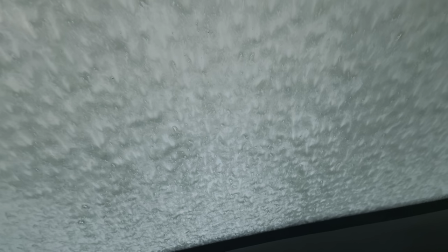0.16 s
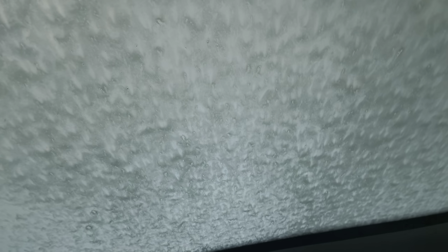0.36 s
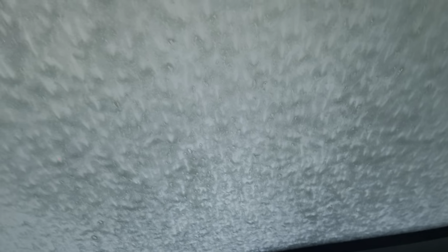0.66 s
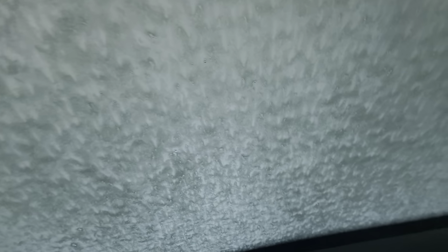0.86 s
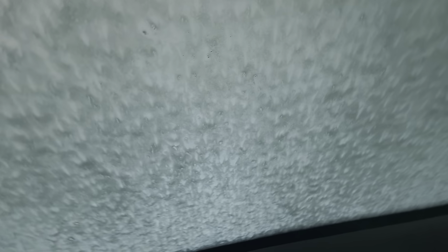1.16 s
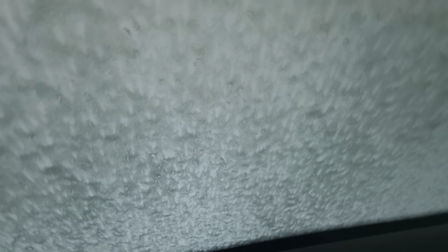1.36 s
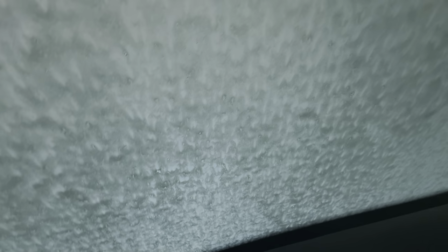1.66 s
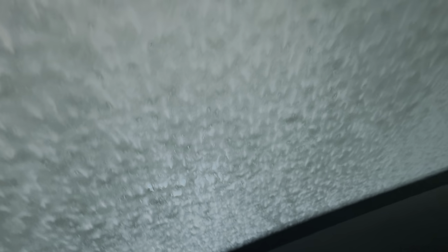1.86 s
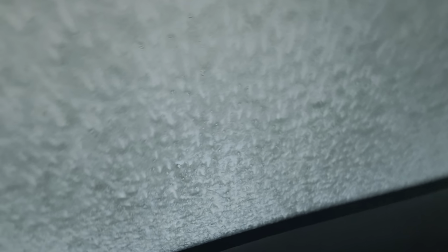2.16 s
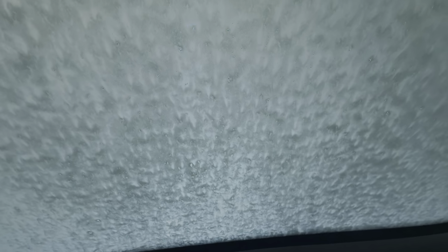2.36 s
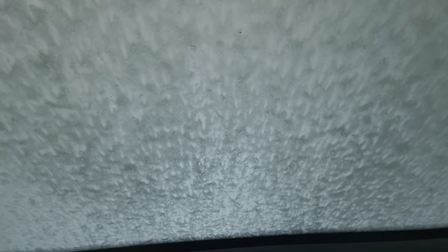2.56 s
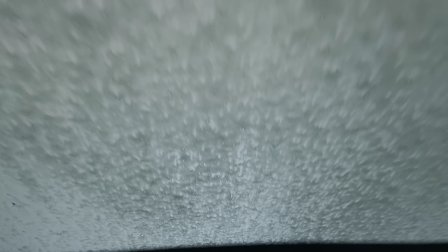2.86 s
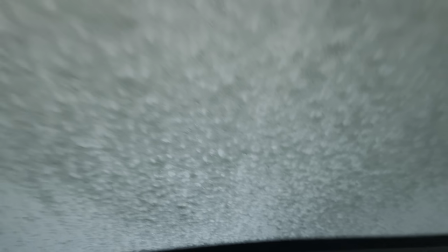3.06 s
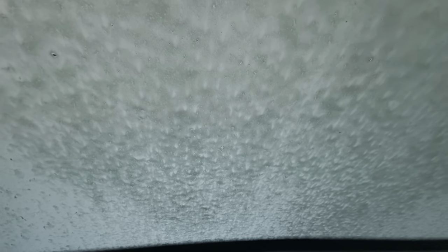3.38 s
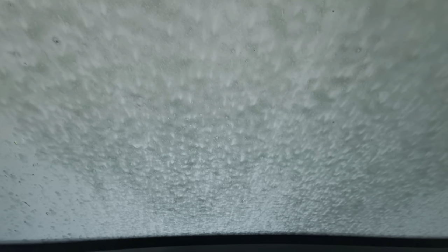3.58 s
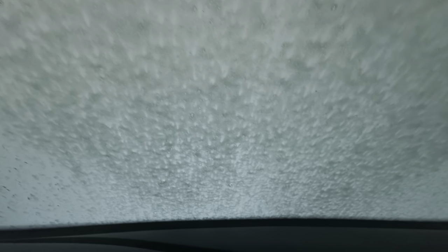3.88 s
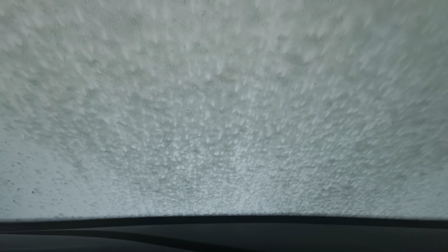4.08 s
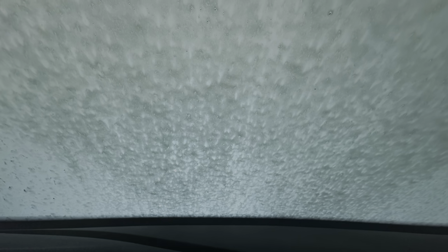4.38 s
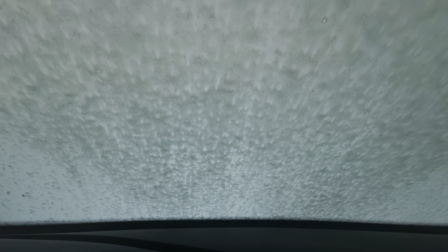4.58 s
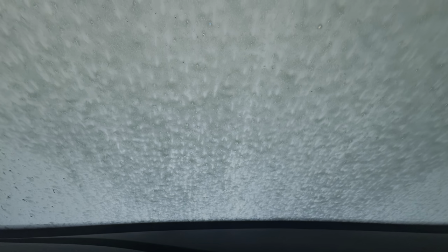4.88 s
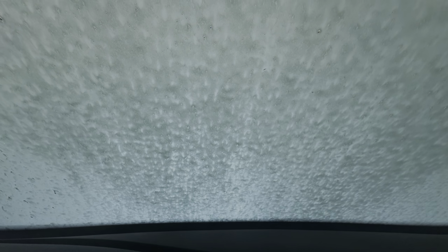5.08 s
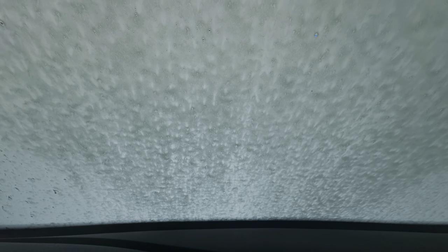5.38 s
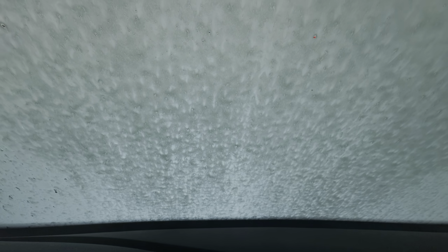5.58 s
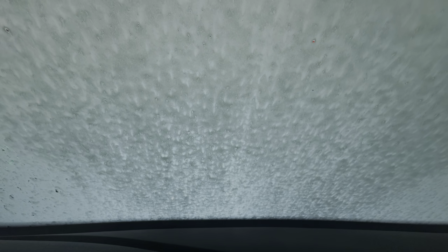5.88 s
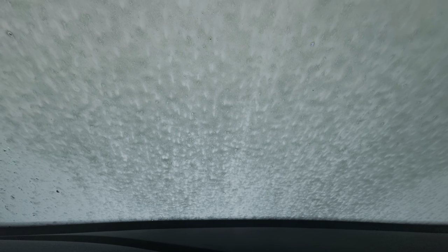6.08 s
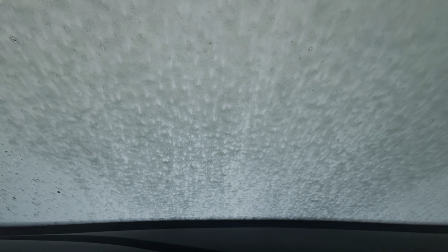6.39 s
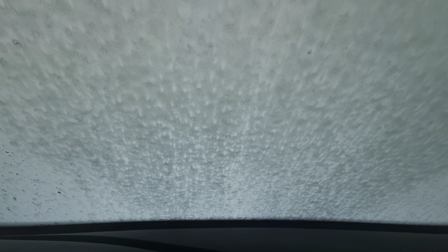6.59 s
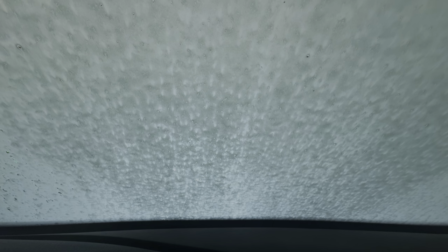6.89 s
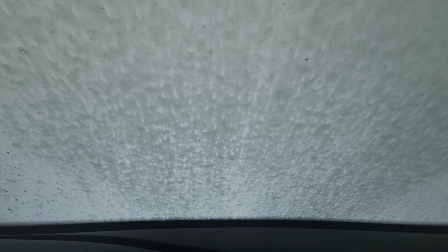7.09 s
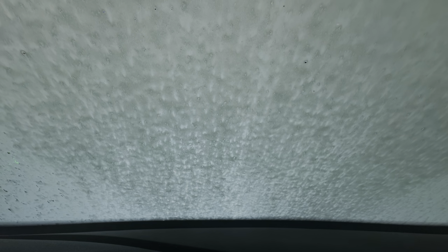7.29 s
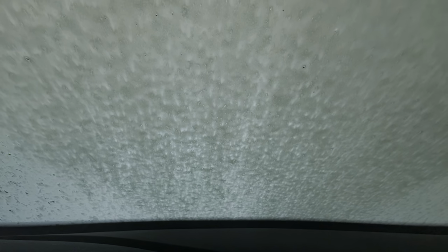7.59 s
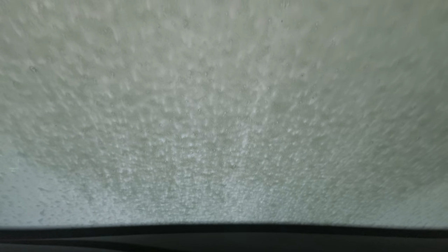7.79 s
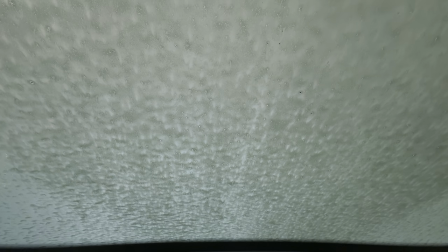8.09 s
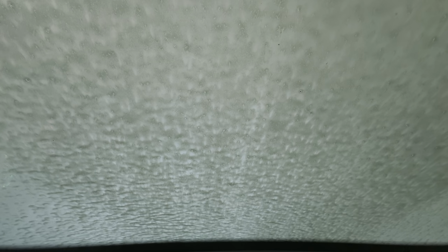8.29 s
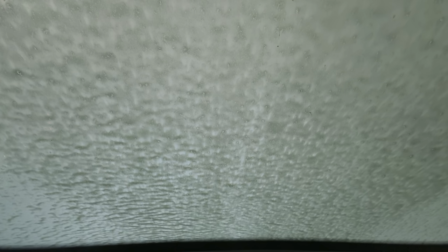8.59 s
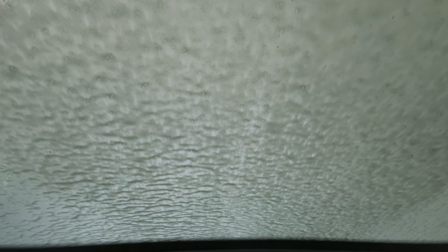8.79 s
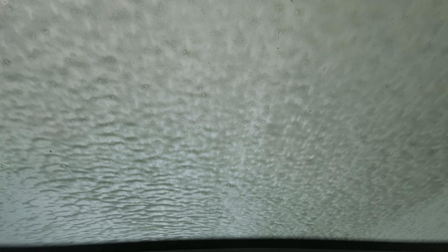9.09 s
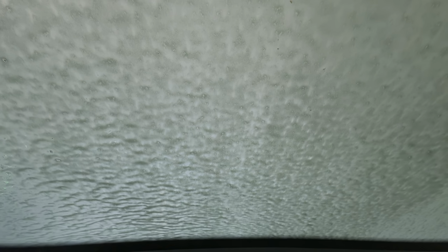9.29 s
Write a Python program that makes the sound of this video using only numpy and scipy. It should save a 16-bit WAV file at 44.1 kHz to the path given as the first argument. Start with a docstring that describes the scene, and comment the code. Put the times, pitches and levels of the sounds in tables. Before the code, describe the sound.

Inside a closed car at an automatic wash, a low, muffled machinery drone runs throughout. Close to the microphone, cloth rustles, scuffs, snaps and ticks, with a few dull knocks, then settles to near stillness. At about five and a half seconds a motor runs up with a swelling hum, a valve opens with a brief high whistle, and fine mist thickens into dense hissing jets on glass and roof.

```python
"""A low machinery drone comes first, dulled by the shell of a closed car in a wash tunnel, with cloth
rustling and ticking close to the microphone: shaped noise, wavering sines, short bursts and decaying modes.
Then a motor runs up, as noise with a climbing top, pump overtones and a hum that swells in the cabin.
A valve opens with a short whistle of two sines, and water beats on glass and roof as hiss that
thickens from mist to jets."""
import sys
import numpy as np
from scipy import signal
from scipy.fft import rfft, irfft
from scipy.io import wavfile
from scipy.ndimage import uniform_filter1d

SR = 44100
rng = np.random.default_rng(int(sys.argv[2]) if len(sys.argv) > 2 else 0)


def dump_mix(stems):
    """Bounce the given channels to the path in sys.argv[1] as a 16-bit WAV at rate SR."""
    frames = np.atleast_2d(stems).T  # one column per channel
    limited = np.clip(frames, -1, 1)  # hard clip at full scale
    pcm = np.round(limited * 32767).astype(np.int16)
    wavfile.write(sys.argv[1], SR, pcm)


def gain_from_decibels(decibels):
    """Convert decibel values to linear amplitude factors."""
    exponent = np.asarray(decibels, float) / 20
    return 10 ** exponent


N = 416744  # samples
QUIET_S, START_S, VALVE_S = 3.6, 5.5, 5.78  # the hand rests, the motor starts, the valve cracks open


def read(points, hz):
    """A spectrum joined by straight lines on a log-frequency axis, -120 dB outside its points."""
    f, value = np.transpose(points)
    return np.interp(np.log(hz + 1), np.log(f + 1), value, left=-120, right=-120)


def follow(rows, t):
    """Columns of a curve at the times t."""
    s, *columns = np.transpose(rows)
    return [np.interp(t, s, c) for c in columns]


def evened(x):
    """Scaled to rms 1."""
    return x / np.sqrt(np.mean(abs(x) ** 2) + 1e-20)


def wander(smooth_s):
    """Slow random movement of rms 1: white noise averaged twice over smooth_s."""
    size = max(int(smooth_s * SR), 2)
    return evened(uniform_filter1d(uniform_filter1d(rng.standard_normal(N), size), size))


def octaves(hz):
    """Distance from 4 kHz in octaves, held below 400 Hz."""
    return np.log2(np.maximum(hz, 400) / 4000)


def peaks(modes, hz):
    """Summed power of resonances, each a quarter of its peak at the edges of its width."""
    power = 0
    for centre_hz, width_hz, db in modes:
        offset = (hz - centre_hz) / (.5 * width_hz)
        power = power + gain_from_decibels(db) ** 2 / (1 + offset ** 2) ** 2
    return power


def tones(t, lines, waver_db, drift_rad, smooth_s):
    """Sines whose level and phase waver slowly."""
    out = np.zeros(len(t))
    for hz, db in lines:
        level = gain_from_decibels(db + waver_db * wander(smooth_s))
        out += level * np.sin(2 * np.pi * hz * t + drift_rad * wander(smooth_s))
    return out


def noise(colour_db, patchy_db, flicker_db, size=1024):
    """Random short-time spectra of rms 1; colour_db(Hz, s) shapes them, patches drift and frames flicker."""
    hop = size // 4
    frames, hz = N // hop + 5, np.fft.rfftfreq(size, 1 / SR)[:, None]
    real, imaginary, patches = rng.standard_normal((frames, len(hz), 3)).T
    patches = evened(uniform_filter1d(uniform_filter1d(patches, 10, axis=0), 10, axis=1))
    frame_s = np.arange(frames)[None] * hop / SR
    shape = gain_from_decibels(colour_db(hz, frame_s) + np.zeros((1, frames)))
    shape = shape / np.sqrt((shape ** 2).mean(0))  # colour alone does not change a frame's level
    gain = gain_from_decibels(patchy_db * patches + flicker_db * rng.standard_normal(frames))
    spectra = (real + 1j * imaginary) * shape * gain
    return evened(signal.istft(spectra, nperseg=size, noverlap=size - hop)[1][:N])


def burst(gain, uneven_db=3.5):
    """Noise of rms 1 with the given spectrum, made uneven as each contact rings a different spot."""
    spots = uniform_filter1d(uniform_filter1d(rng.standard_normal(len(gain)), 60), 60)
    white = rfft(rng.standard_normal(2 * len(gain) - 2))
    return evened(irfft(white * gain * gain_from_decibels(uneven_db * evened(spots))))


# Faint tunnel background: (frequency [Hz], relative density [dB per Hz])
MURMUR_COLOUR = [(900, -10), (1400, 1.5), (1700, -8), (2600, -13), (3600, -9.5), (4100, -23), (6000, -40.5)]


def murmur():
    """Far water and machines flutter faintly in the middle tones."""
    return gain_from_decibels(-82.5) * noise(lambda hz, s: read(MURMUR_COLOUR, hz), 3.5, 1.1, size=512)


# Distant machinery through the closed shell: (frequency [Hz], relative density [dB per Hz])
DRONE_COLOUR = [(12, -30.5), (22, -25.5), (30, -23), (38, -7), (60, -13.5), (100, -7), (170, -15),
                (200, -20.5), (460, -24.5), (545, -32), (830, -38), (1400, -45.5), (1650, -54), (3500, -60),
                (9000, -84.5)]
# Its level at the microphone: (time [s], level [dB])
DRONE_CURVE = [(0, -41), (1.4, -40), (2.4, -42.5), (5.5, -43.5), (5.8, -41.5), (6.5, -39.5), (7.5, -33),
               (8, -39.5), (9.45, -29.5)]
# Cabin modes and far tones that stand out: (frequency [Hz], width [Hz], lift relative to the drone [dB])
CABIN_MODES = [(48.8, 13, 11), (69.4, 14, 11.5), (90.85, 3.4, 2.5), (122.5, 2.4, 3), (161.2, 2.7, 6),
               (265.4, 11.6, 4.5), (382.5, 9.8, 1.5), (461, 30, 2)]
# Distant motors: (frequency [Hz], level [dB])
FAR_MOTORS = [(46, -47), (92, -51), (120, -53.5), (158, -58.5), (268, -62.5)]


def drone(t):
    """Far pumps and fans, dull through the shell and lifted at the cabin modes."""
    def colour_db(hz, s):
        return read(DRONE_COLOUR, hz) + 10 * np.log10(1 + peaks(CABIN_MODES, hz))
    rumble = gain_from_decibels(follow(DRONE_CURVE, t)[0]) * noise(colour_db, 0.57, 0.26, size=8192)
    return rumble + tones(t, FAR_MOTORS, waver_db=2.43, drift_rad=1.04, smooth_s=0.25)


# Cloth close to the microphone, also in scuffs and ticks: (frequency [Hz], relative density [dB per Hz])
CLOTH_COLOUR = [(400, -10.5), (800, -3), (2000, -3.5), (4500, -7.5), (7500, -4), (12000, -1.5),
                (17000, -15.5)]
# Its rustle: (time [s], level [dB])
RUSTLE_CURVE = [(0, -53.5), (.06, -56.5), (.36, -59.5), (.78, -60), (1.08, -64), (1.25, -58.5), (1.4, -58),
                (1.6, -62.5), (1.8, -63.5), (2.05, -72), (2.5, -79), (2.86, -79), (3.02, -70), (3.2, -75),
                (3.4, -73.5), (3.7, -85), (5.6, -86)]


def cloth(t):
    """Fibres sliding: a soft hiss that follows the hand."""
    def colour_db(hz, s):
        tilt_db = np.where(s < QUIET_S, 0.3, -1.5)  # brightening per octave, moving and then resting
        return read(CLOTH_COLOUR, hz) + tilt_db * octaves(hz)
    hiss = noise(colour_db, 1.5, .8, size=256)
    return gain_from_decibels(follow(RUSTLE_CURVE, t)[0]) * hiss * (t < VALVE_S)


# Short sliding strokes of cloth near the microphone:
# (time [s], length [s], hiss level [dB], brightening [dB per octave], dull body level [dB])
STROKES_OF_CLOTH = [(0.151, 0.087, -59.5, -1, -61), (0.43, 0.072, -70, 8, -81),
                    (1.299, 0.008, -47.5, 0, -55), (1.33, 0.0082, -39, 2, -64), (1.43, 0.02, -66, -4, -52),
                    (1.452, 0.025, -53.5, 1, -51.5), (1.495, 0.022, -46, 1.5, -40),
                    (1.546, 0.016, -48, 5, -56), (1.596, .008, -52, -5, -42), (2.021, .008, -50, 0, -58),
                    (2.123, .008, -40, 7, -48), (1.89, 0.031, -68, 3, -79), (2.306, 0.061, -71, 0, -69),
                    (2.515, 0.06, -67.5, 6, -60.5), (2.581, 0.06, -70.5, 1, -64),
                    (2.894, 0.05, -46, 3, -56.5), (2.945, 0.069, -64, 4, -72),
                    (3.039, 0.027, -55.5, 5, -51), (3.098, 0.049, -56.5, 1.5, -62),
                    (3.15, 0.02, -59, 6, -65), (3.286, 0.027, -55.5, 0.5, -56),
                    (3.322, 0.039, -59.5, 3, -56.5), (3.406, 0.02, -66.5, -2.5, -72),
                    (4.4, 0.067, -74.5, -5.5, -84)]
# Dull ring of the plastic trim, also in ticks: (frequency [Hz], width [Hz], level [dB])
TRIM_MODES = [(395, 570, 10.5), (904, 1200, 4.5), (1520, 900, -3), (2040, 670, -11), (2900, 540, -7.5)]


def scuffs():
    """Each stroke holds a hiss over the dull body of the trim, then dies away."""
    out, t = np.zeros(N), np.arange(8192) / SR
    hz = np.fft.rfftfreq(len(t), 1 / SR)
    for s, length_s, level_db, tilt_db, body_db in STROKES_OF_CLOTH:
        hiss = gain_from_decibels(level_db) * burst(gain_from_decibels(read(CLOTH_COLOUR, hz) + tilt_db * octaves(hz)))
        body = gain_from_decibels(body_db) * burst(np.sqrt(peaks(TRIM_MODES, hz)))
        hold = (1 - np.exp(-t / 0.0037)) * gain_from_decibels(-60 * np.maximum(t - length_s, 0) / 0.056)
        out[round(s * SR):][:len(t)] += hold * (hiss + body)
    return out


def settling():
    """Rows of faint snaps at random times while the cloth rests."""
    per_s, level_db, spread_db = 4, -73, 3.5
    rest_s = START_S - QUIET_S
    rows = []
    for when, loud, bright, ring in rng.random((round(per_s * rest_s), 4)):
        crack_db = level_db + spread_db * (2 * loud - 1)
        rows.append((QUIET_S + when * rest_s, crack_db, level_db, 10 * bright - 3, 2000 + 10000 * ring))
    return rows


# Snaps of cloth and trim, levels before the envelopes:
# (time [s], bright crack [dB], dull body [dB], brightening [dB per octave], ringing spot [Hz])
SNAPS = [(0.2713, -45, -51, 0, 2180), (0.3105, -35.5, -45, -3, 11800), (0.383, -42.5, -68, 4, 7000),
         (0.555, -32.5, -41.5, 1, 3720), (0.79, -35, -47.5, 0.5, 8550), (0.9393, -33.5, -43, -1, 3750),
         (0.9505, -42, -44, -1.5, 3770), (0.962, -47, -51, -2, 3700), (0.992, -37, -56, 2.5, 6650),
         (1.0882, -50, -55.5, 0, 2010), (1.1497, -20, -44, 3, 6000), (1.1709, -42, -37, 4, 2930),
         (1.211, -33, -48, 2, 8500), (1.4923, -36, -30, 0.5, 2040), (1.53, -50, -34.5, 3, 2310),
         (1.5504, -40, -50, 5, 8700), (1.5952, -38, -36, -5, 2040), (1.8233, -37, -55, 2, 7660),
         (2.0208, -36, -46, -1.5, 2460), (2.1203, -22.5, -42.5, 6, 7500), (2.7121, -30.5, -46, 2.5, 3700),
         (3.049, -56, -46, 0, 2100), (3.2246, -50.5, -70, 5, 2000), (3.2886, -50, -50, 0, 2100),
         (3.5843, -55.5, -68, -1, 12700), (4.268, -67, -72.5, 7, 12500), (4.3187, -56, -77, 1.5, 8000),
         (4.4189, -66, -75, 7, 11800), (4.5555, -68, -75, 7, 12500), (5.1068, -58, -75, -5, 7210)]


def ticks():
    """Each snap is a bright crack with a short tail and one ringing spot, over a dull ring of the trim."""
    ring_width, ring_db, uneven_db = .09, 9, 3  # width as a share of the ringing frequency
    out, t = np.zeros(N), np.arange(8192) / SR
    hz = np.fft.rfftfreq(len(t), 1 / SR)
    for s, crack_db, body_db, tilt_db, ring_hz in SNAPS + settling():
        t60_s = max(.038 + 0.0025 * max(tilt_db, -2), .015)  # brighter snaps ring longer
        tail = gain_from_decibels(-60 * t / t60_s)
        spot = np.sqrt(1.5 + peaks([(ring_hz, ring_width * ring_hz, ring_db)], hz))
        colour = gain_from_decibels(read(CLOTH_COLOUR, hz) + tilt_db * octaves(hz)) * (hz > 2000)
        crack = gain_from_decibels(crack_db) * burst(colour * spot, uneven_db)
        crack *= (1 - np.exp(-t / .0006)) * (.42 * gain_from_decibels(-60 * t / 0.0088) + 0.38 * tail)
        ring = gain_from_decibels(body_db) * burst(np.sqrt(peaks(TRIM_MODES[1:], hz)), uneven_db)
        ring *= (1 - np.exp(-t / 0.0016)) * tail
        out[round(s * SR):][:len(t)] += crack + ring
    return out


# Knocks against the case: (time [s], level before the envelope [dB], frequency [Hz], 60 dB decay [s])
KNOCKS = [(1.4816, -14, 112, 0.043), (1.49, -28, 60.5, 0.62), (1.532, -11, 120.6, 0.085),
          (3.052, -32, 159, 0.13), (3.3, -40.5, 380, 0.14), (5.721, -24.5, 50.5, 0.57)]


def thumps(t):
    """A low mode of the case or the cabin, pushed once."""
    out = np.zeros(N)
    for s, level_db, hz, t60_s in KNOCKS:
        since = np.maximum(t - s, 0)
        envelope = (1 - np.exp(-since / 0.0054)) * gain_from_decibels(level_db - 60 * since / t60_s)
        out += envelope * np.sin(2 * np.pi * hz * since)
    return out


# Water on glass and roof, at the microphone inside: (time [s], level [dB])
SPRAY_CURVE = [(5.53, -92), (5.55, -74.5), (5.68, -70.5), (5.77, -77), (5.79, -65), (5.95, -59),
               (5.98, -54), (6.88, -52), (6.98, -42.5), (7.3, -43), (8.0, -44), (8.72, -44), (9.1, -41.5),
               (9.27, -40.5), (9.35, -36), (9.45, -39.5)]
# The fine mist that comes first: (frequency [Hz], relative density [dB per Hz])
MIST_COLOUR = [(1500, -5.5), (1800, -5), (2100, -2.5), (2500, -6), (3150, -3.5), (4600, -7.5), (8500, -7),
               (12000, -4), (17000, -12)]
# The full jets: (frequency [Hz], relative density [dB per Hz])
JETS_COLOUR = [(1000, -2), (1600, -2.5), (2200, 3), (2700, -1), (3300, 1), (3600, 0.5), (4200, -2.5),
               (5300, 0), (6300, -2), (7400, -2.5), (8100, -2), (12000, -5.5), (17000, -7)]


def spray(t):
    """Dense water: a hiss that thickens from mist to jets, and the whistle of the valve."""
    mist_s, jets_s, jets_rise_s = 5.97, 6.88, 0.072  # mist flows, full jets cut in

    def colour_db(hz, s):
        # jets louder than -43.5 dB break up into more mist
        finer = .12 * np.maximum(follow(SPRAY_CURVE, s)[0] + 43.5, 0)
        full = np.clip((s - jets_s) / jets_rise_s, 0, 1) * np.clip(.97 - finer, .55, 1)
        # top of the hiss with the valve shut, cracked and open
        top_hz = np.where(s < VALVE_S, 4300, np.where(s < mist_s, 12800, 17000))
        mist_db = read(MIST_COLOUR, np.maximum(hz, 1600))
        jets_db = read(JETS_COLOUR, np.maximum(hz, 1050))
        blend_db = (1 - full) * mist_db + full * jets_db
        return blend_db - 10 * np.log10(1 + (hz / top_hz) ** 9) - 60 * (hz < 700)

    water = gain_from_decibels(follow(SPRAY_CURVE, t)[0]) * noise(colour_db, 0.85, 0.4, size=512) * (t > START_S)
    whistle_hz = 5750 * (1 + .02 * wander(0.003))
    phase = 2 * np.pi * np.cumsum(whistle_hz) / SR
    whistle = np.sin(phase) + .9 * np.sin(2 * phase)
    whistle *= gain_from_decibels(-64.5 - 25 * (t - VALVE_S)) * (t > VALVE_S) * (t < mist_s)  # fades 25 dB per s
    return water + whistle


# The near motor and its air: (frequency [Hz], relative density [dB per Hz])
ROAR_COLOUR = [(40, -20), (60, 3.5), (80, 0), (100, -3.5), (160, -3.5), (220, -3.5), (290, -7), (400, -13),
               (550, -15), (700, -19), (1000, -22.5), (1600, -26.5), (3000, -59)]
# Its roar in the cabin: (time [s], level [dB])
ROAR_CURVE = [(5.5, -60.5), (5.62, -44.5), (5.9, -41), (6.8, -43), (7.2, -39), (8, -39), (9.1, -39.5),
              (9.45, -38.5)]
# Doors and glass that ring with it: (frequency [Hz], width [Hz], lift relative to the roar [dB])
PANEL_MODES = [(390, 135, 1), (673, 110, 3.5), (881, 170, 3), (1123, 90, 3), (1373, 80, 2)]
# The hum in the cabin: (time [s], level [dB])
HUM_CURVE = [(5.5, -48), (5.68, -41), (5.97, -44), (6.07, -36.5), (6.12, -30), (6.35, -33), (6.41, -44),
             (6.92, -44.5), (7.03, -34.5), (7.48, -32), (7.55, -26.5), (8.1, -29), (8.9, -28), (9.25, -29),
             (9.33, -23), (9.45, -42)]
# Overtones of the plunger pump: (multiple of the stroke rate [1], level at the loudest roar [dB])
PUMP_OVERTONES = [(5, -45), (6, -54.5), (7, -54.5), (8, -54.5), (9, -56), (10, -57.5), (11, -71), (12, -56),
                  (14, -67), (15, -73), (16, -58.5), (17, -58), (18, -59), (27, -69), (28, -62), (29, -74),
                  (30, -83)]
# Other motor tones: (frequency [Hz], level at the loudest roar [dB])
MOTOR_TONES = [(204, -46.5), (852, -56.5), (893, -64.5), (932, -59.5), (1145, -65), (1225, -69),
               (1385, -64.5)]


def motor(t):
    """A roar whose top rises with the speed, the hum booming in the cabin, pump overtones and fuzzy tones."""
    climb_s, full_speed_s, pump_hz = 5.65, 6.1, 39.97

    def colour_db(hz, s):
        # the top climbs steadily until full speed, then opens up
        top_hz = 380 + 2250 * np.maximum(s - climb_s, 0) + 12000 * np.maximum(s - full_speed_s, 0)
        over = hz / top_hz
        howl_db = 9 * np.exp(-((over - 1) / .11) ** 2)  # the blades sing at the top of the roar
        panels_db = 10 * np.log10(1 + peaks(PANEL_MODES, hz))
        return read(ROAR_COLOUR, hz) + panels_db + howl_db - 10 * np.log10(1 + over ** 3.9)

    level_db = follow(ROAR_CURVE, t)[0]
    roar = gain_from_decibels(level_db) * noise(colour_db, 2.06, .2, size=2048)
    # the hum sags by 16 Hz under the starting load and settles at full speed
    hum_hz = 120.2 - 16 * np.exp(-((t - 5.8) / .2) ** 2)
    turn = np.exp(2j * np.pi * np.cumsum(hum_hz) / SR)
    shaken = turn * (1 + 0.17 * (wander(0.016) + 1j * wander(0.014)))  # the shaking shell smears the hum
    with_octave = (shaken + gain_from_decibels(-23.5) * shaken ** 2).real
    hum = np.sqrt(2) * gain_from_decibels(follow(HUM_CURVE, t)[0]) * with_octave
    lines = [(multiple * pump_hz, db) for multiple, db in PUMP_OVERTONES] + MOTOR_TONES
    whine = tones(t, lines, waver_db=2.15, drift_rad=1.14, smooth_s=0.18)
    whine *= gain_from_decibels(0.55 * (level_db - level_db.max())) * np.clip((t - 5.9) / 0.32, 0, 1)
    return (roar + hum + whine) * np.clip((t - START_S) / 0.095, 0, 1)


def scene():
    """All sources at the one microphone inside the car."""
    t = np.arange(N) / SR
    background = murmur() + drone(t)
    near = cloth(t) + scuffs() + ticks() + thumps(t)
    return (background + near + spray(t) + motor(t))[None]


def top_cut(x):
    """Nothing passes above the cut-off."""
    return signal.sosfilt(signal.butter(12, 15800, fs=SR, output="sos"), x)


# The small microphone port, with two notches: (frequency [Hz], gain [dB])
PORT_RESPONSE = [(20, 0), (8300, 0), (8900, -5), (9350, -19), (9650, -26), (9950, -14), (10500, -8.5),
                 (11500, -1.5), (12500, -1), (13400, -2), (14100, -8), (14500, -17), (14750, -40),
                 (14950, -19), (15300, -13), (15720, -6), (15800, -56)]


def record(dry):
    """The microphone port colours the treble and the electronics add hiss."""
    hz = np.fft.rfftfreq(2048, 1 / SR)
    gain = gain_from_decibels(np.interp(hz, *np.transpose(PORT_RESPONSE))) * (hz < hz[-1])
    port = signal.firwin2(1023, hz, gain, fs=SR)
    self_noise = gain_from_decibels(-96) * rng.standard_normal(dry.shape)
    mix = signal.oaconvolve(dry, port[None], "same") + self_noise
    return top_cut(mix)


dry = scene()
out = record(dry)
dump_mix(out)
```